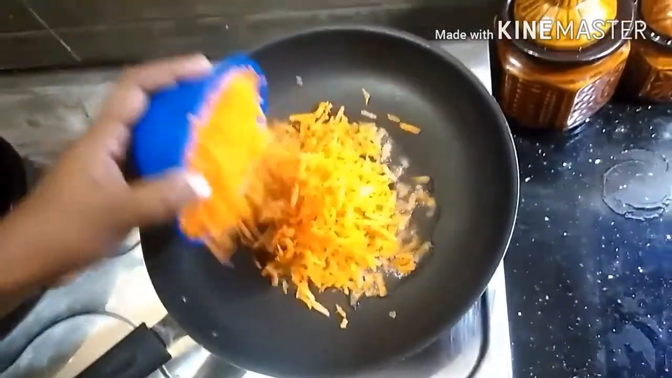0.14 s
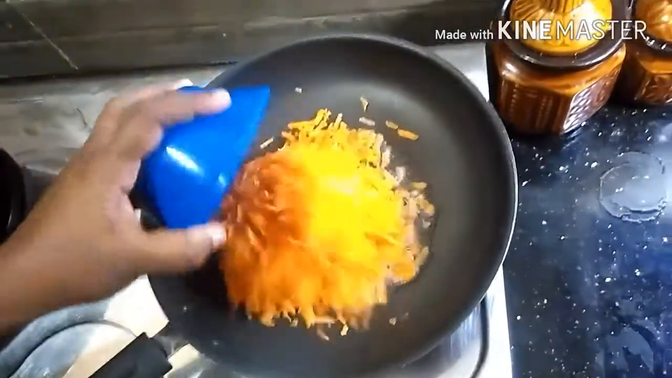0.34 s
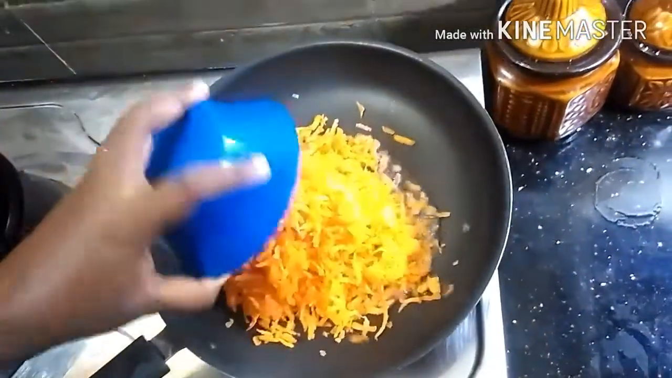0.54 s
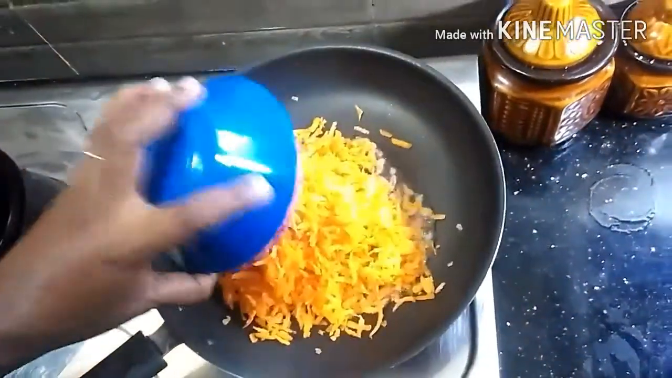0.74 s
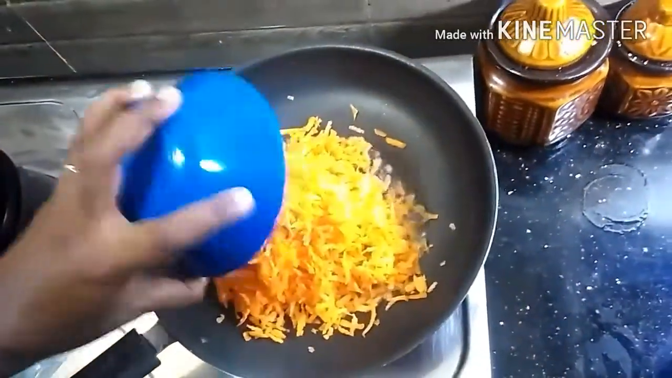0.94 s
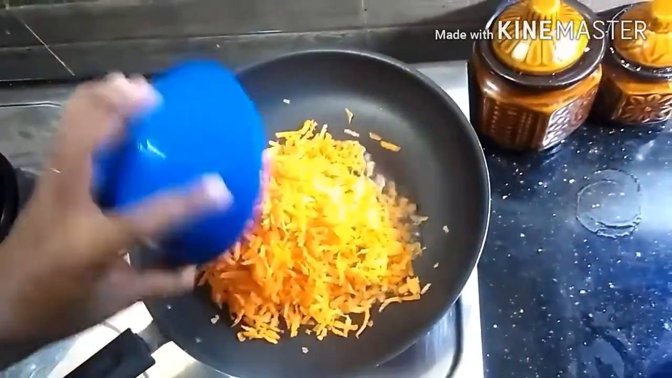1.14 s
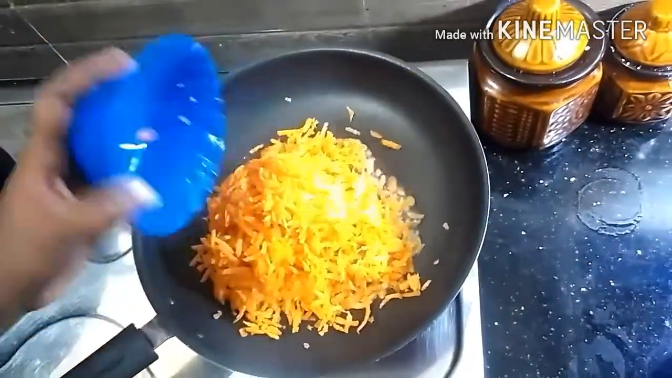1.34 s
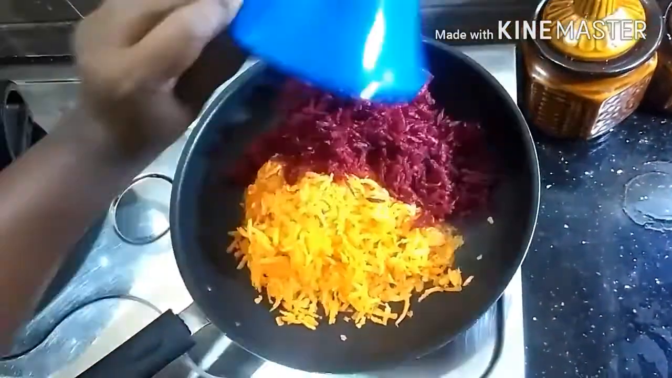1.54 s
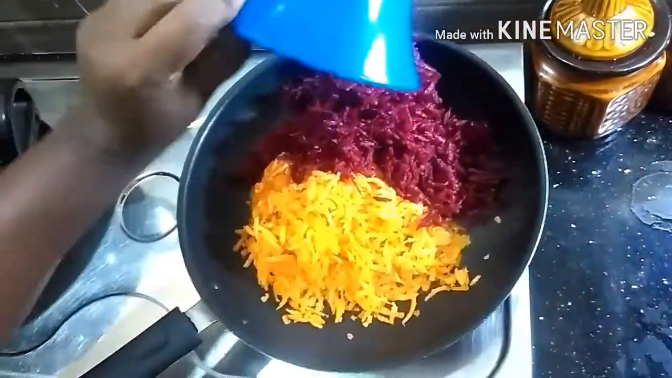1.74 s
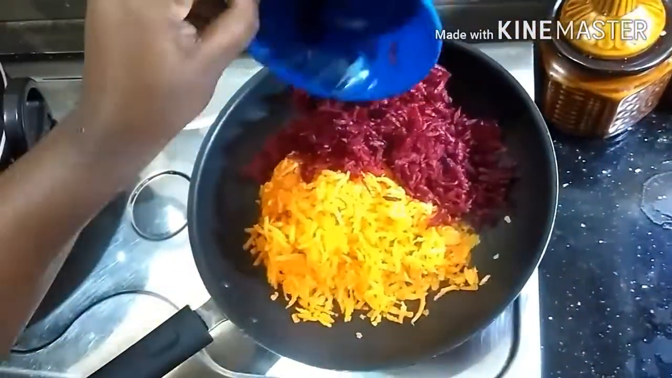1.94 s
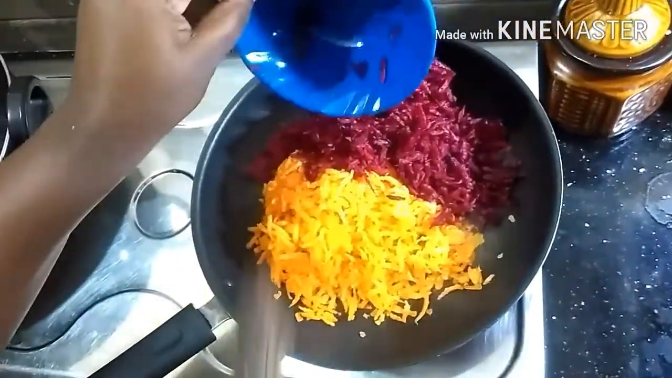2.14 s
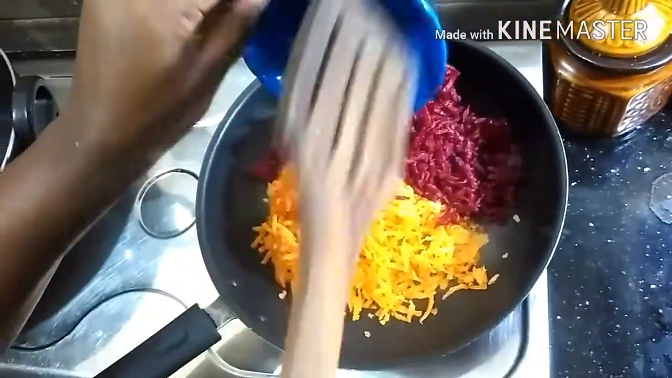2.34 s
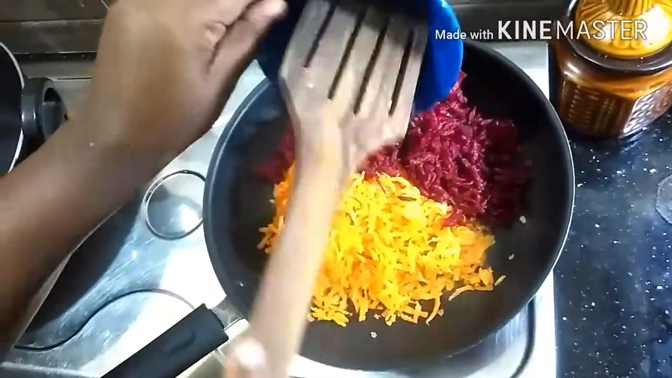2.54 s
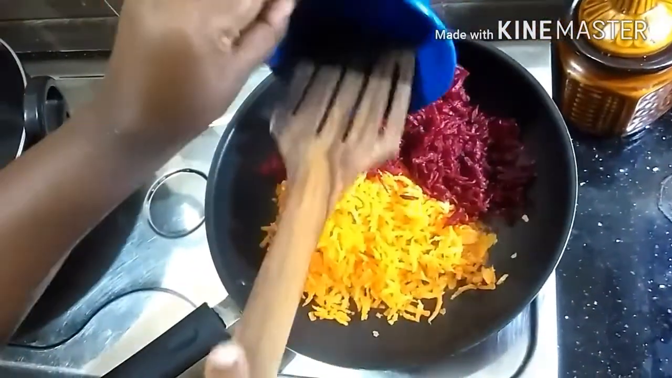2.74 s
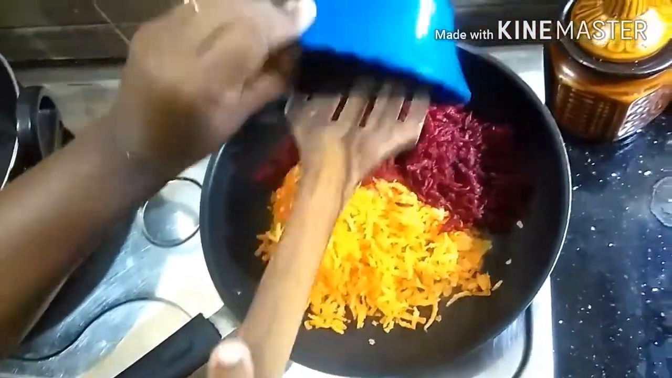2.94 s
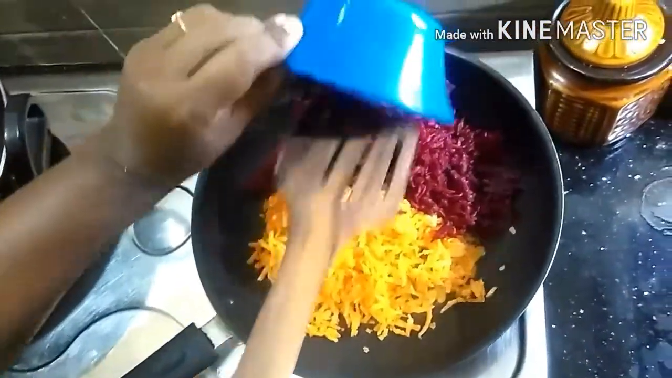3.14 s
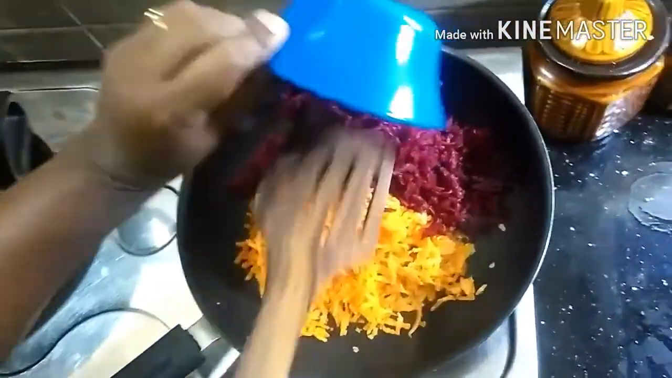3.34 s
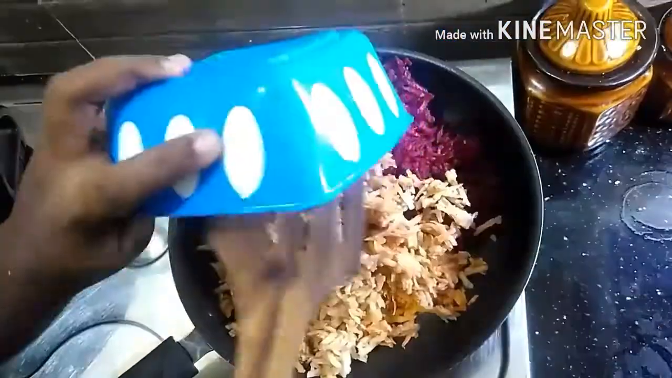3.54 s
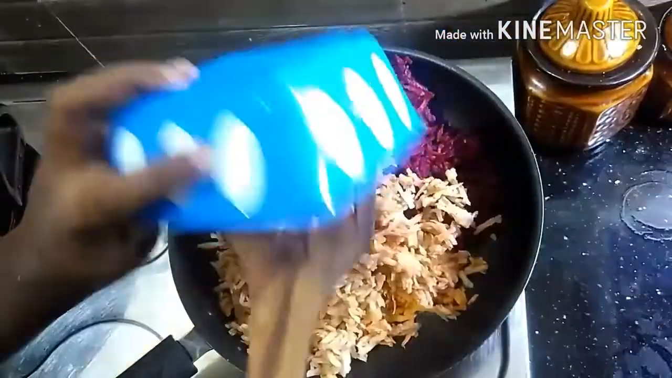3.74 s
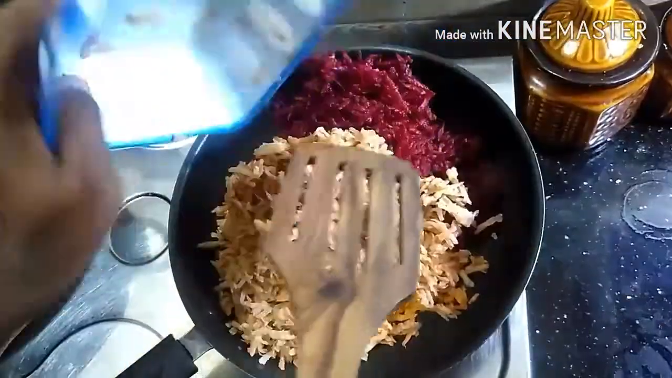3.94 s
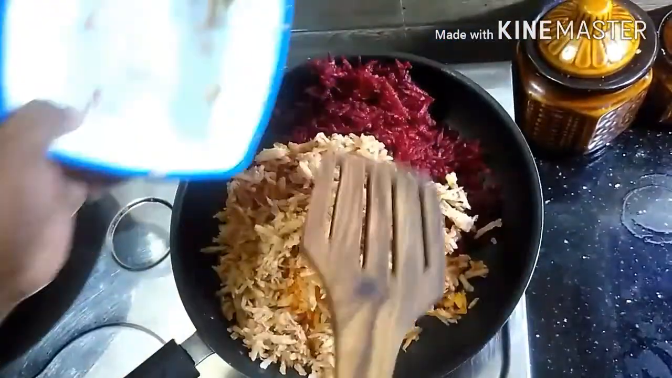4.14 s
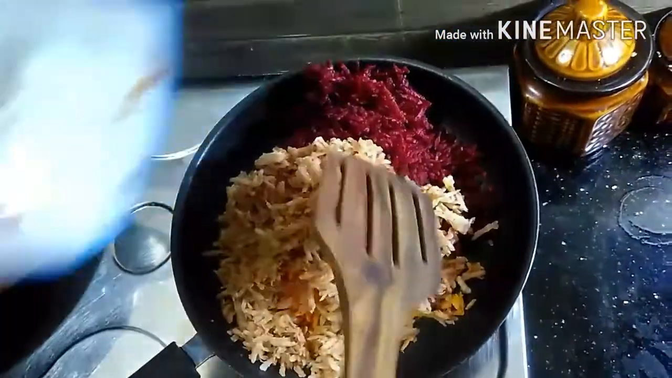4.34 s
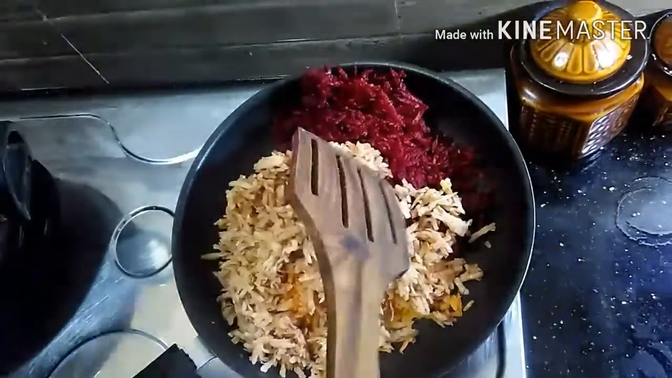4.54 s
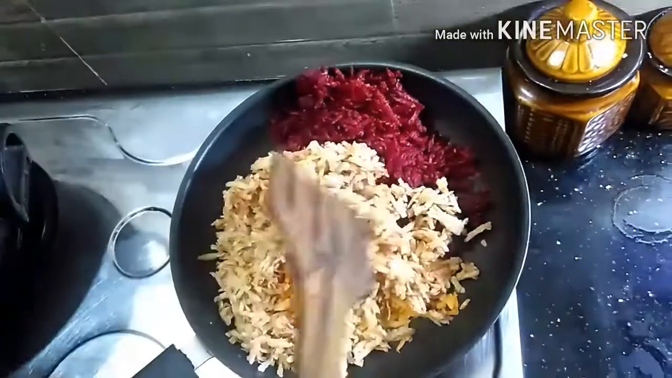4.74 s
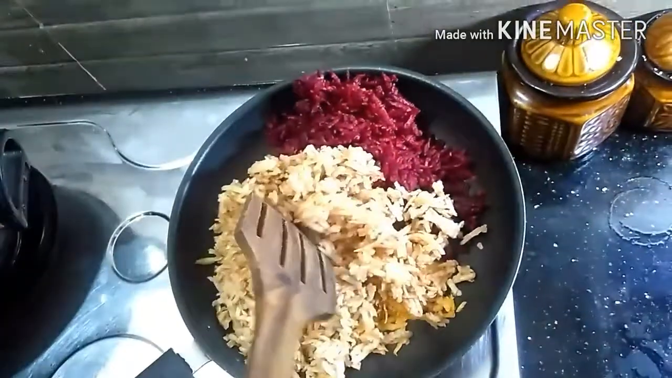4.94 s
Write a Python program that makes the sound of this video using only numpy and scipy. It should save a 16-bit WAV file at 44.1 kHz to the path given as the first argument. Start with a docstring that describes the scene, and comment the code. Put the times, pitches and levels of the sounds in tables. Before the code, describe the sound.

A fierce bright frying hiss with snapping spits settles to a faint simmer, followed by hollow wood-on-plastic knocks in a small tiled kitchen.

```python
"""Vegetables tipped into hot oil

Steam bubbles burst in a dense sizzle (noise under random bursts) with single loud spits (damped rings).
Heaps land with a dull thud (noise through pan resonances) over a low roar and a burner's rush of gas.
A wooden spatula knocks on a plastic bowl (decaying modes and a crack) in a small tiled kitchen.
A phone listens with two microphones of opposite polarity; the left one faces the pan."""
import sys
import numpy as np
from scipy import signal
from scipy.fft import rfft, irfft, next_fast_len
from scipy.io import wavfile
from scipy.ndimage import uniform_filter1d, map_coordinates

SR = 44100
rng = np.random.default_rng(int(sys.argv[2]) if len(sys.argv) > 2 else 0)


def how_loud(loudness_db):
    """Turn decibels into a plain amplitude multiplier (0 dB gives 1, 20 dB gives 10)."""
    steps = np.asarray(loudness_db, float) / 20
    return 10 ** steps


def transcribe(u):
    """Save the signal u as a 16-bit wav file named by the first command-line argument.

    u: samples, shape (n,) or (channels, n), limited to [-1, 1]; the rate is SR.
    q: integer samples, one column per channel.
    """
    v = np.clip(np.atleast_2d(u).T, -1, 1)
    q = np.round(v * 32767).astype(np.int16)
    wavfile.write(sys.argv[1], SR, q)


N = 223531

# colour of the fine sizzle and the spits: (frequency [Hz], relative density [dB])
SIZZLE_COLOUR = [(3500, -60), (5000, -17.5), (7000, -7.5), (8500, -1), (10300, 2.5), (11200, 0.5),
                 (12200, -3.5), (14250, -7.5), (15000, -104)]
# coherence of left and right: (frequency [Hz], likeness [0 to 1])
LIKENESS = [(100, 0.94), (640, 0.71), (1400, 0.23), (3000, 0.32), (7000, 0.0079)]


def unit(x):
    """Normalisation to a root mean square of 1."""
    return x / np.sqrt(np.mean(x ** 2) + 1e-20)


def along(points, hz):
    """Interpolation of (frequency [Hz], value) points on a logarithmic frequency axis."""
    f, v = np.transpose(points)
    return np.interp(np.log(hz + 1), np.log(f + 1), v)


def sides(db):
    """Level difference: gains of left and right that lie db apart."""
    return how_loud(np.array([db / 2, -db / 2]))


def curves(rows):
    """Linear interpolation in time: one value per sample for each column after the time."""
    s, *columns = np.transpose(rows)
    return [np.interp(np.arange(N) / SR, s, c) for c in columns]


def dying(rows, rise):
    """Superposition of (time, size, time constant) events: linear rise, exponential relaxation."""
    t = np.arange(N) / SR
    total = np.zeros(N)
    for s, size, fade in rows:
        onset = np.clip((t - s) / rise, 0, 1)
        total += size * onset * np.exp(-np.clip(t - s - rise, 0, 9) / fade)
    return total


def filtered(x, response):
    """Linear filtering: the spectrum of x times a complex response of frequency."""
    m = next_fast_len(N + 8192)
    return irfft(rfft(x, m) * response(np.fft.rfftfreq(m, 1 / SR)), m)[..., :N]


def resonances(modes):
    """Damped oscillators in parallel, alternating in sign: (centre [Hz], width [Hz], gain [dB])."""
    def response(f):
        total = 0
        for k, (centre, width, db) in enumerate(modes):
            damping = 1j * f * width
            total = total + (-1) ** k * how_loud(db) * damping / (centre ** 2 - f * f + damping)
        return total
    return response


def rush(spectrum, envelope, patchy_db):
    """Filtered noise: coloured stereo noise of rms 1 with random gain patches and partial coherence."""
    z = signal.stft(envelope * rng.standard_normal((2, N)), nperseg=256)[2]
    field = uniform_filter1d(rng.standard_normal(z.shape[1:]), 4, 0)  # smooth over frequency
    field = uniform_filter1d(field, 12, 1)  # smooth over time
    pair = signal.istft(z * how_loud(patchy_db * unit(field)), nperseg=256)[1][:, :N]

    def mid_side(hz):
        angle = np.arccos(np.clip(along(LIKENESS, hz), -1, 1)) / 2  # sets the coherence
        return how_loud(along(spectrum, hz)) * [np.cos(angle), np.sin(angle)]

    mid, side = filtered(pair, mid_side)
    return unit(np.array([mid + side, mid - side]))


def bursting(rate, spread_db, life, share):
    """Shot noise: envelope of rms 1 from random decaying bursts (per s, dB, s) over a steady bed."""
    strength = how_loud(2 * spread_db * np.minimum(rng.exponential(size=N), 4))
    power = (rng.random(N) < rate / SR) * strength
    power = signal.lfilter([1], [1, -np.exp(-1 / (life * SR))], power)
    return np.sqrt(1 - share + share * power / power.mean())


def frying():
    """Bubble shot noise: fine bubbles hiss, wet ones splutter lower; both follow water meeting oil."""
    # frying between flare-ups; the left-right balance of the sizzle drifts a little:
    # (time [s], fine sizzle [dB], wet splutter [dB], left-right difference of the sizzle [dB])
    base_levels = [(0.0, -15.5, -24, 2), (0.34, -16.5, -22, 3), (0.58, -14, -19, 4.5),
                   (0.85, -16, -23, 5.5), (1.24, -20.5, -25.5, 3.5), (1.44, -19.5, -25, 3.5),
                   (1.58, -24.5, -30, 3.5), (1.68, -32, -44.5, 2.5), (1.92, -30.5, -40, 6),
                   (2.09, -30.5, -40.5, 3), (2.41, -30.5, -36.5, 2.5), (2.75, -34, -42, 5),
                   (3.35, -34, -39.5, 5), (3.57, -37, -41.5, 3.5), (3.79, -39, -47.5, 8.5),
                   (3.98, -39.5, -43, 2.5), (4.22, -34, -41, 9), (4.6, -36, -44, 3),
                   (5.07, -36.5, -41.5, -1)]
    # fresh water reaches the oil, the sizzle flares up and settles:
    # (time [s], rise [dB], settling time constant [s])
    flares = [(0.1, 5.5, 0.025), (0.355, 3.5, 0.016), (0.408, 7.5, 0.042), (0.474, 0, 0.0072),
              (0.54, 0, 0.19), (0.99, 3.5, 0.91), (1.275, 7, 0.014), (1.71, 4.5, 0.11), (1.89, 2.5, 0.048),
              (2.435, 4.5, 0.15), (2.78, 4.5, 0.11), (2.9, 4, 0.13), (3.805, 6, 0.35), (4.205, 1.5, 0.045),
              (4.52, 6, 0.25)]
    # single bubbles: rate [per s], spread [dB], life [s], share of power [0 to 1]
    crackle = (700, 2, 0.0004, 0.2)
    # colour of the wet splutter: (frequency [Hz], relative density [dB])
    splutter_colour = [(250, -33), (400, -54), (800, -12), (1150, -18), (1500, -10), (2200, 3.5), (2800, 5),
                       (3400, 4), (5000, 4.5), (7000, 0), (9000, -36)]
    sizzle_db, wet_db, side_db = curves(base_levels)
    flare_db = dying(flares, rise=0.0027)

    fine = bursting(rate=1300, spread_db=0.5, life=0.017, share=0.32) * bursting(*crackle)
    hiss = rush(SIZZLE_COLOUR, fine, patchy_db=1.2)
    wet = bursting(rate=390, spread_db=20.0, life=0.009, share=0.038)
    wet = wet * bursting(rate=860, spread_db=-1.0, life=0.0017, share=0.33)
    splutter = rush(splutter_colour, wet, patchy_db=3.0)

    hiss = how_loud(sizzle_db + flare_db) * sides(side_db) * hiss
    return hiss + how_loud(wet_db + 0.58 * flare_db) * sides(0.26)[:, None] * splutter


def burner():
    """Filtered noise: a low roar whose level wanders at random, booms at jolts, and a rush of gas."""
    # the pan shifts on its stand and the stove booms: (time [s], level [dB], t60 [s])
    jolts = [(0.4, -31, 0.087), (0.51, -42, 0.11), (2.2, -48, 0.41), (2.57, -39, 0.51), (3.74, -37, 0.9)]
    # colour of the low roar: (frequency [Hz], relative density [dB])
    roar_colour = [(20, -41), (53, 7), (86, -4), (113, 0.5), (220, -9), (320, -26.5)]
    # gas rushing from the burner: (frequency [Hz], relative density [dB])
    gas_colour = [(150, -99), (300, 3), (450, 6.5), (650, -3), (1200, -2.5), (2000, 3.5), (3000, -30),
                  (4500, -34)]
    roar_db, wander_db, wanders_per_s = -51.5, 2, 7
    # a smooth curve through random values
    wander = map_coordinates(rng.standard_normal(100), [np.arange(N) / SR * wanders_per_s])
    decays = [(s, how_loud(db), t60 / np.log(1000)) for s, db, t60 in jolts]
    booms = dying(decays, rise=0.0059)
    roar = rush(roar_colour, 1, patchy_db=5.0) * (how_loud(roar_db + wander_db * wander) + booms)
    gas = how_loud(-49.5) * rush(gas_colour, 1, patchy_db=4.5)
    return sides(2.1)[:, None] * (roar + gas)


def heaps():
    """Noise-driven resonance: soft loads slide down and shake the modes of the pan."""
    # heaps slumping into the pan: (time [s], level [dB], slide length [s], t60 [s])
    slumps = [(0.05, -43.5, 0.023, 0.46), (0.44, -27.5, 0.041, 0.34), (0.54, -57, 0.15, 0.7),
              (0.78, -50.5, 0.063, 0.36), (2.563, -43, 0.011, 0.092), (3.743, -37.5, 0.014, 0.18)]
    # the pan under a soft load: (frequency [Hz], width [Hz], relative gain [dB])
    pan_modes = [(115, 8.6, -34), (277, 13, -19), (342, 10.3, 10), (406, 31, 5), (524, 64, -0.5),
                 (569, 15, 3.5), (816, 88, -4), (944, 32, 4), (980, 125, 1.5)]
    t, envelope = np.arange(N) / SR, np.zeros(N)
    for s, db, slide, t60 in slumps:
        decay_db = 60 * np.clip(t - s - slide, 0, 9) / t60
        envelope += how_loud(db - decay_db) * np.clip((t - s) / 0.016, 0, 1)
    shared, own = unit(filtered(rng.standard_normal((2, N)), resonances(pan_modes)))
    return envelope * sides(3.6)[:, None] * [shared + 0.18 * own, shared - 1.03 * own]


def spits():
    """Impulsive release: a steam pocket snaps, rings, reflects and fizzes; a low thump goes with it."""
    # loud spits of oil: (time [s], level [dB], low thump relative to it [dB])
    pockets = [(0.0957, 6.5, -11), (0.2486, 9, -2), (0.1324, -10, -13), (0.1555, -7, -15),
               (0.2995, -7, -15), (0.2804, -2.5, -18), (0.411, -8, -6), (0.4295, -6, -12), (0.5678, 0, -9),
               (0.7706, -1, -11), (1.288, -4, -15), (1.749, -16, 15), (2.8998, -10, -16),
               (3.353, -17, -27.5), (3.8083, -17, -22), (4.12, -22, -13), (4.2097, -7, -19),
               (4.52, -6.5, -15), (4.595, -15, -11)]
    ring_hz, snap_s, fizz_s = 9850, 0.00075, 0.01
    rim_s, rim_db = 0.0017, -14.5  # the far rim of the pan throws the snap back
    out, impulses, t = np.zeros((2, N + SR)), np.zeros(N), np.arange(SR // 4) / SR
    for s, db, thump_db in pockets:
        start = round(s * SR)
        noise = rng.standard_normal((2, len(t)))
        detune, turn = rng.standard_normal(2)
        phase = np.array([[0], [np.pi + 0.24 * turn]])  # nearly opposite on the right
        ring = np.sin(2 * np.pi * ring_hz * (1 + 0.024 * detune) * t + phase)
        snap = np.exp(-t / snap_s) * (0.51 * ring + 0.07 * noise)
        reflection = how_loud(rim_db) * np.roll(snap, round(rim_s * SR), axis=1)
        fizz = 0.29 * np.exp(-t / fizz_s) * noise
        out[:, start:][:, :len(t)] += how_loud(db) * sides(4.7)[:, None] * (snap + reflection + fizz)
        impulses[start] = how_loud(db + thump_db)
    thump = sides(1.8)[:, None] * filtered(impulses, resonances([(800, 1500, -1)]))
    return filtered(out[:, :N], lambda hz: how_loud(along(SIZZLE_COLOUR, hz))) + thump


def kitchen(x):
    """Reverberation: one diffuse tail a microphone, coherent in the bass, with decay set by frequency."""
    # decay of the room: (frequency [Hz], t60 [s])
    room_decay = [(200, 0.3), (1200, 0.39), (2500, 0.26), (4000, 0.15), (8000, 0.11)]
    walls_s = 0.0066  # delay of the first answer from the tiles
    hz, t, z = signal.stft(rng.standard_normal((2, SR // 2)), SR, nperseg=256)
    alike = along(LIKENESS, hz)[:, None]
    z[1] = alike * z[0] + np.sqrt(1 - alike ** 2) * z[1]
    decay = how_loud(-60 * t / along(room_decay, hz)[:, None])
    tail = signal.istft(z * decay, SR, nperseg=256)[1]
    delayed = np.pad(x, (round(walls_s * SR), 0))[None]
    return signal.fftconvolve(delayed, tail / np.linalg.norm(tail[0]), axes=1)


def knocks():
    """Modal excitation: where the blow lands decides which modes ring; the left hears them a little late."""
    # spatula and hand on the bowl: (time [s], level [dB], main pitch [Hz], second pitch [Hz],
    # its level [dB], third pitch [Hz], its level [dB], crack relative to the knock [dB])
    blows = [(1.0, -15, 1870, 2360, 5, 1330, -10, -15.5), (1.563, -27.5, 2280, 1310, -30, 2680, 2, -21),
             (2.434, 1, 1820, 1163, 0, 3270, -7.5, 2), (2.483, -18, 1790, 1314, 3, 2680, -11, -15),
             (2.462, -10, 1729, 1150, 3, 2680, -9, -18), (2.7547, -7.5, 2240, 827, -6, 1460, -10, 1.5),
             (2.775, -16, 2240, 1430, -5, 820, -10, -9), (2.9851, -4, 860, 3015, -9.5, 1314, -7.5, -20),
             (3.001, -4.5, 1580, 783, 1, 1314, -4.5, -4), (3.014, -23, 1500, 730, -18, 1314, -14, -16),
             (3.026, -17, 1314, 800, 0, 1990, -28, -16), (3.049, -15.5, 1314, 730, -26, 1790, -18, -22),
             (3.2462, -6.5, 1676, 950, -8, 2740, -11, 1.5),
             (3.7557, -23.5, 2000, 1570, 0.5, 2800, -8.5, -13),
             (3.757, -22.5, 490, 860, -21, 1500, -14, -1), (3.855, -23.5, 1990, 1590, -3, 1160, -4, -10),
             (3.8606, -22, 1990, 1110, 10.5, 1590, -18, 9)]
    # modes of the bowl: (frequency [Hz], relative level [dB], t60 [s])
    bowl_modes = [(343, 15, 0.41), (467, 10, 0.02), (626, 7.5, 0.04), (730, 0, 0.036), (860, -3.5, 0.034),
                  (950, 0.5, 0.031), (1163, -9, 0.038), (1314, -3.5, 0.079), (1500, -3.5, 0.025),
                  (1590, -7, 0.025), (1729, -7.5, 0.03), (1790, -2.5, 0.045), (1990, 1.5, 0.025),
                  (2240, -2, 0.017), (2680, 2, 0.026), (3015, -5.5, 0.068), (3355, -8.5, 0.029),
                  (4200, 8, 0.02), (5450, -9, 0.02)]
    lowest_hz = 313  # the small bowl radiates little below
    # snap of wood on plastic; its top falls as the blow softens [dB per dB]
    crack_low_hz, crack_top_hz, dulling = 495, 4900, 0.64
    grip_detune = 0.015  # the hand bends each mode a little [fraction]
    far_ring_s = 0.005  # only the first of the ring carries to the walls
    out, t = np.zeros((2, N + 2 * SR)), np.arange(SR // 8) / SR
    hz, level_db, t60 = np.transpose(bowl_modes)[:, :, None]
    late = t - np.array([.00015, 0])[:, None, None]  # left, right [s]

    def near(pitch_hz):
        """Modes close to a pitch are driven most."""
        return 1 / (1 + (np.log2(hz / pitch_hz) / 0.11) ** 2)

    for s, db, main_hz, second_hz, second_db, third_hz, third_db, crack_db in blows:
        start = round(s * SR)
        drive = near(main_hz) + how_loud(second_db) * near(second_hz) + how_loud(third_db) * near(third_hz)
        struck = drive * how_loud(level_db + rng.standard_normal(hz.shape))
        bent_hz = hz * (1 + grip_detune * rng.standard_normal(hz.shape))
        partials = struck * how_loud(-60 * late / t60) * np.sin(2 * np.pi * bent_hz * late)
        ring = np.sum(partials * (late > 0), axis=1)
        ring = how_loud(db) * ring * (1 - np.exp(-t / 0.0015))

        top_hz = np.clip(crack_top_hz * how_loud(dulling * db), 2500, 12000)
        band = signal.butter(3, [crack_low_hz, top_hz], "band", fs=SR, output="sos")
        crack = signal.sosfilt(band, rng.standard_normal((2, len(t))))
        crack = crack * how_loud(db + crack_db - 60 * t / 0.015) * (1 - np.exp(-t / 0.000097))

        echo = how_loud(-3.0) * kitchen(ring[1] * np.exp(-t / far_ring_s) + 0.88 * crack[1])
        out[:, start:][:, :len(t)] += sides(1.0)[:, None] * (ring + crack)
        out[:, start:][:, :echo.shape[1]] += sides(3.25)[:, None] * echo
    return signal.sosfilt(signal.butter(4, lowest_hz, "high", fs=SR, output="sos"), out[:, :N])


def thuds():
    """Critically damped response: single low thumps without ring at two of the knocks."""
    # low thumps: (time [s], level [dB])
    thumps = np.array([(2.434, -28), (3.759, -32)])
    u = np.clip(np.arange(N) / SR - thumps[:, :1], 0, 9) / 0.0007  # in units of the time to the peak
    return sides(12.5)[:, None] * np.sum(how_loud(thumps[:, 1:]) * u * np.exp(1 - u), axis=0)


def scene():
    """Superposition of everything on and around the stove."""
    return frying() + burner() + heaps() + spits() + knocks() + thuds()


def band_limit(x):
    """A steep low-pass at the top of the band."""
    return signal.sosfilt(signal.butter(12, 15450, fs=SR, output="sos"), x)


def record(dry):
    """Transduction: the right microphone is reversed and coloured; treble is cut, loud peaks clip."""
    # right microphone against the left one: (frequency [Hz], gain [dB])
    right_colour = [(300, -1), (1400, -3), (3000, -6.5), (7000, 1.5), (10000, -3.5), (14000, -5.5)]
    right = -filtered(dry[1], lambda hz: how_loud(along(right_colour, hz)))
    pair = filtered(np.array([dry[0], right]), lambda hz: hz < 14450)
    return band_limit(np.clip(pair, -1, 1))


dry = scene()
out = record(dry)
transcribe(out)
```